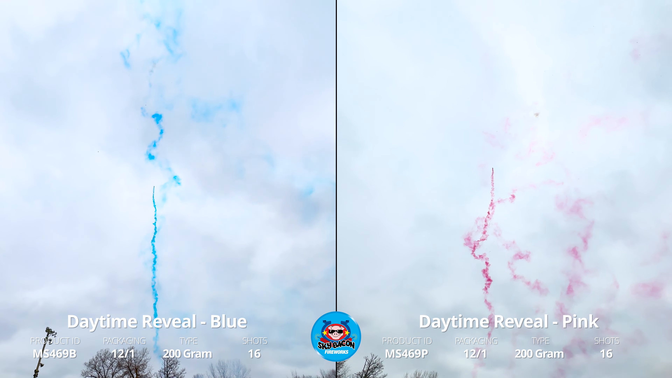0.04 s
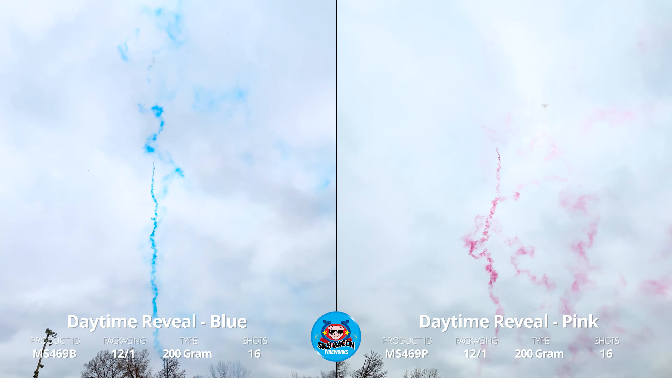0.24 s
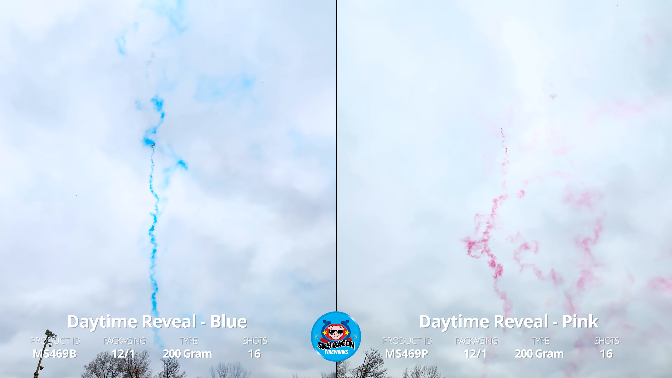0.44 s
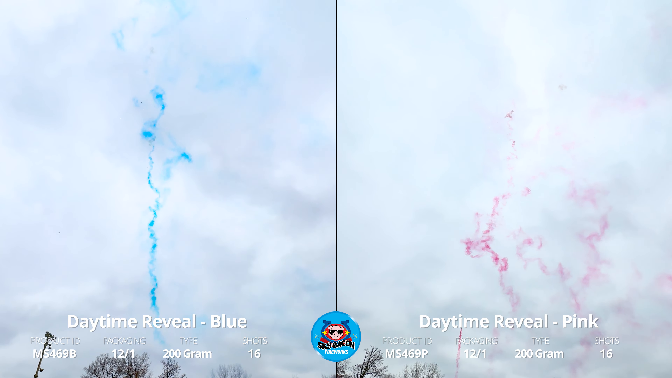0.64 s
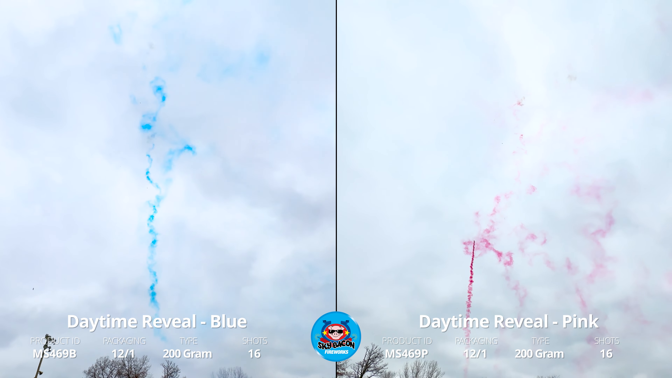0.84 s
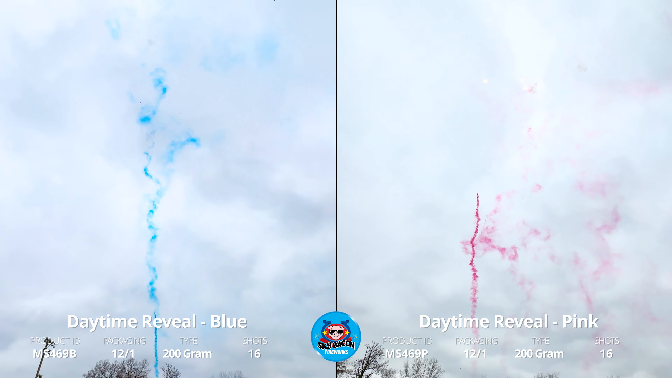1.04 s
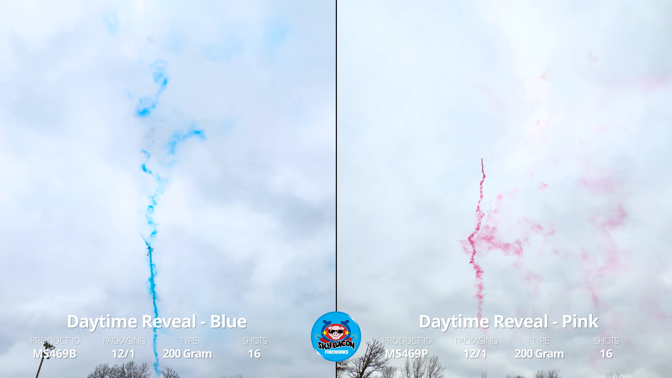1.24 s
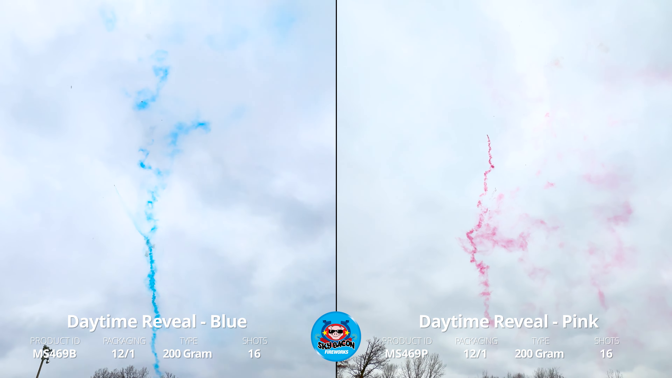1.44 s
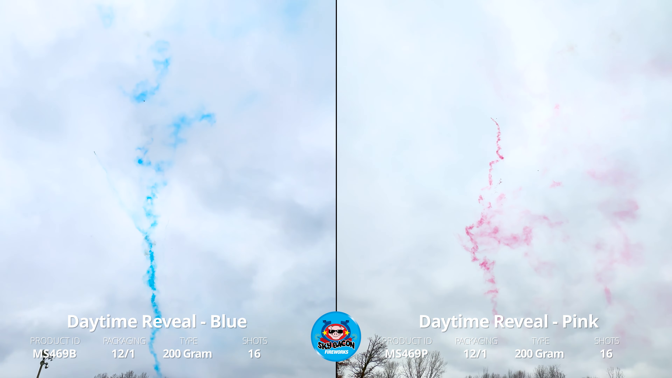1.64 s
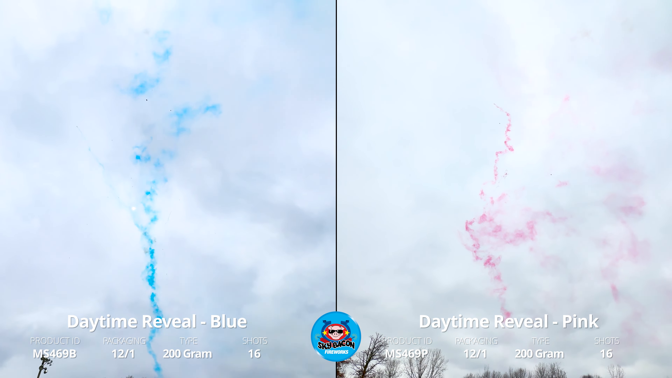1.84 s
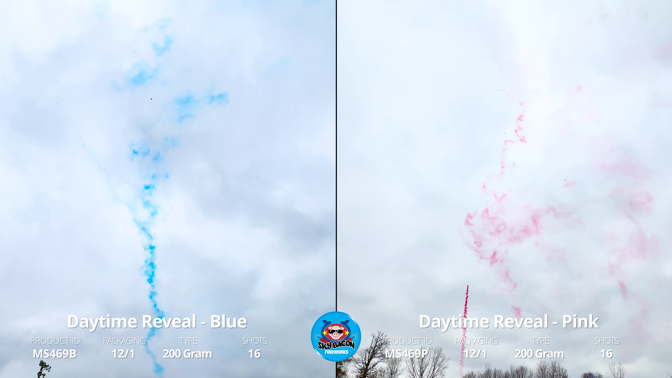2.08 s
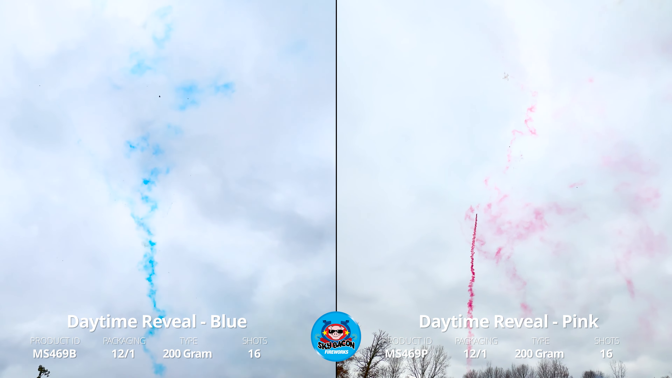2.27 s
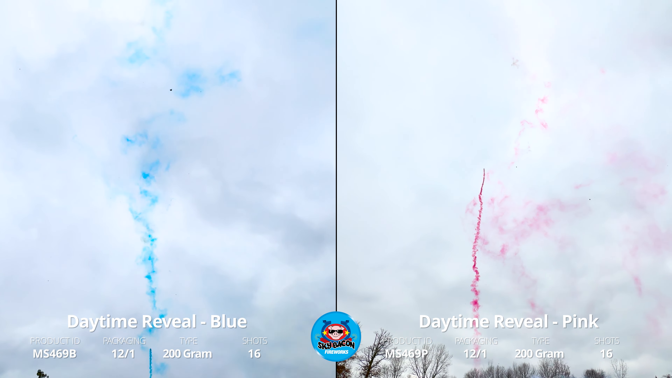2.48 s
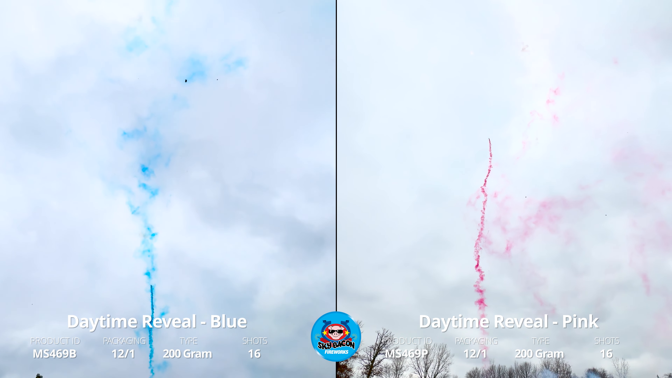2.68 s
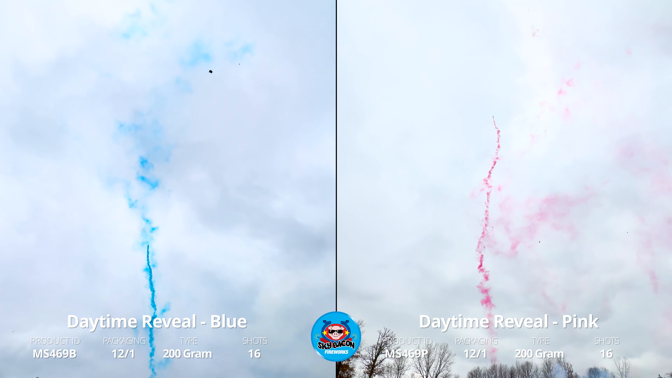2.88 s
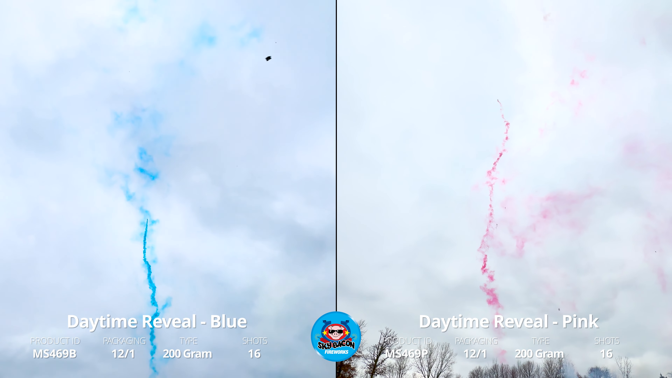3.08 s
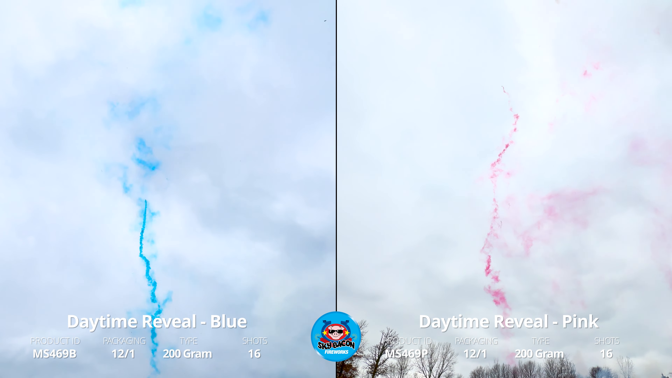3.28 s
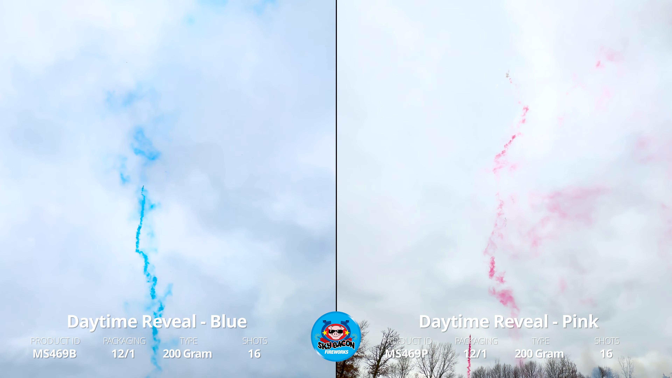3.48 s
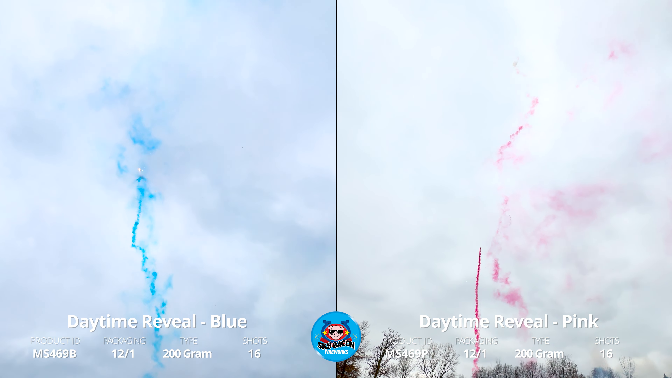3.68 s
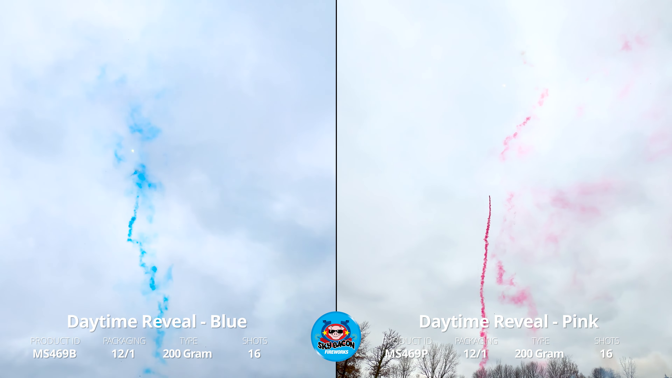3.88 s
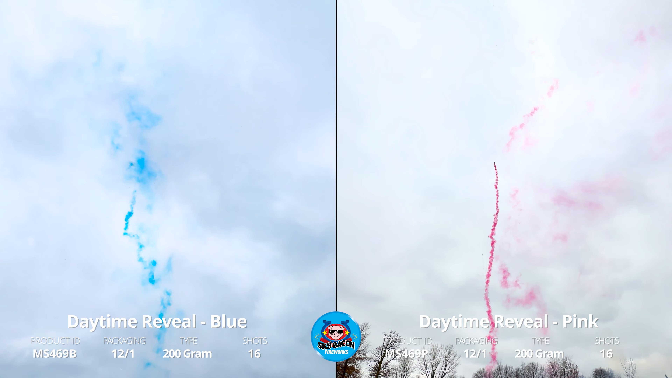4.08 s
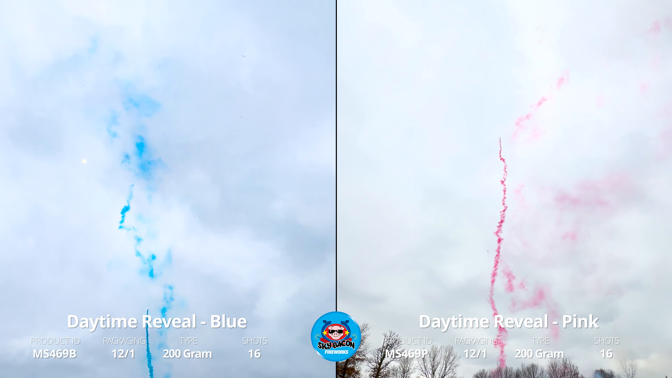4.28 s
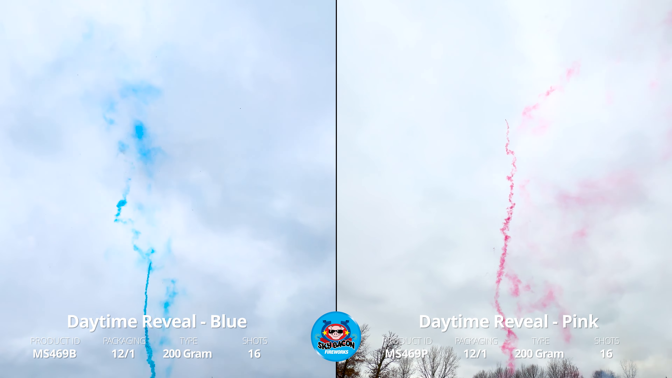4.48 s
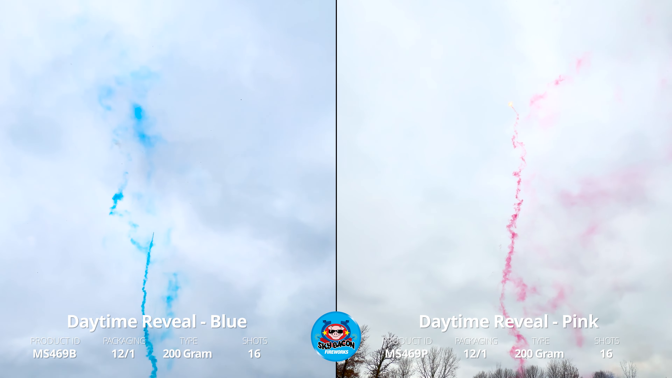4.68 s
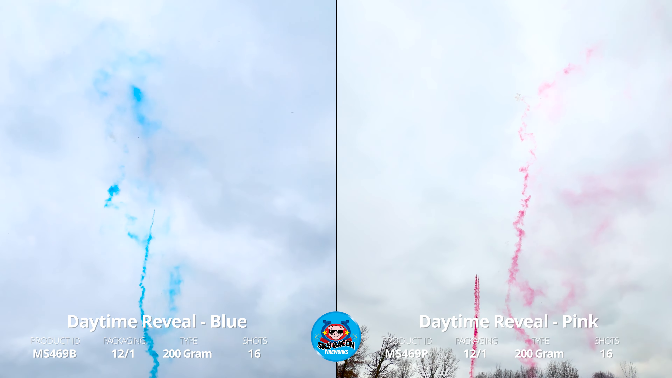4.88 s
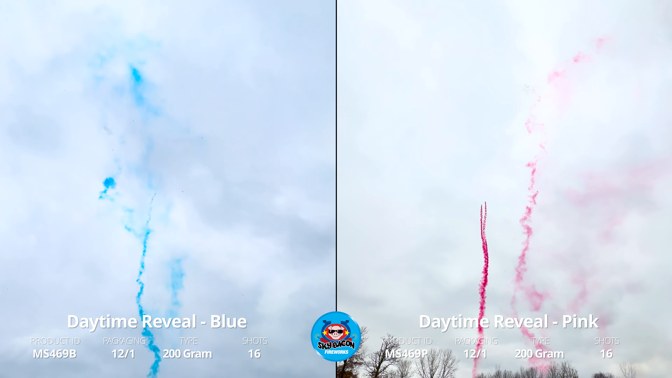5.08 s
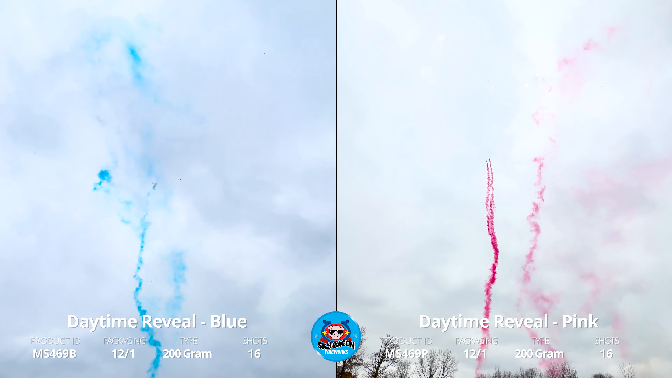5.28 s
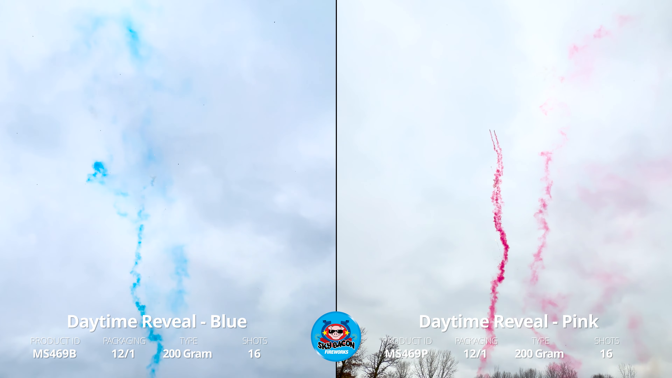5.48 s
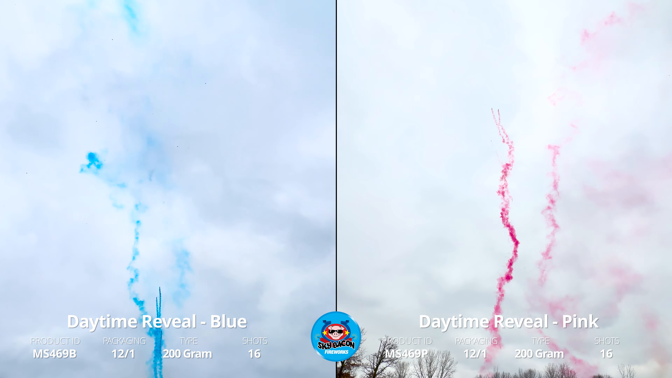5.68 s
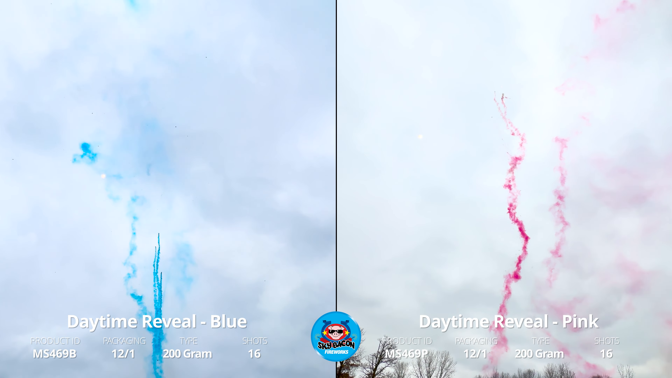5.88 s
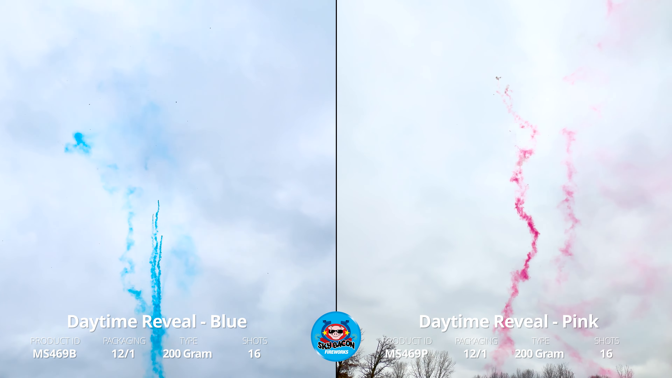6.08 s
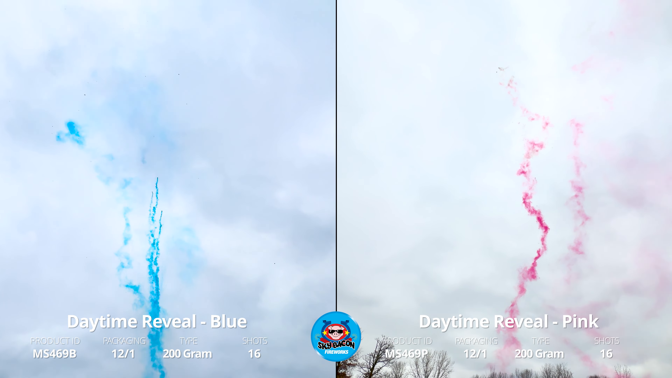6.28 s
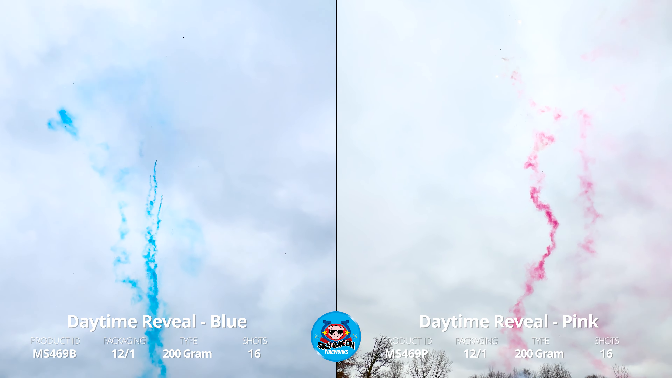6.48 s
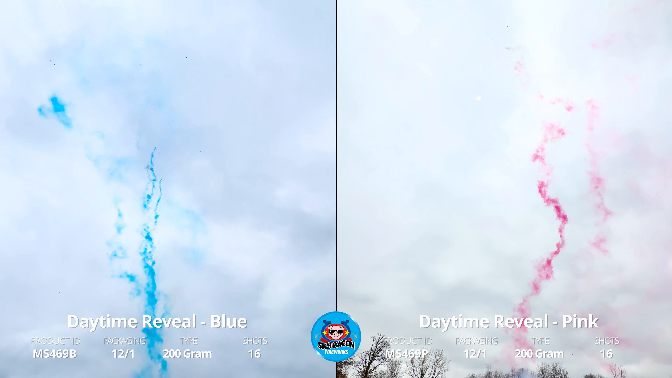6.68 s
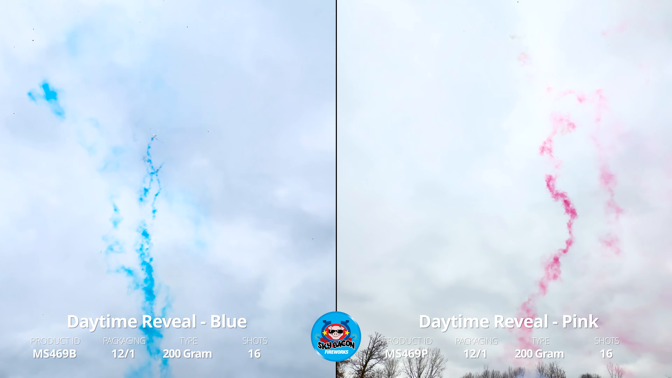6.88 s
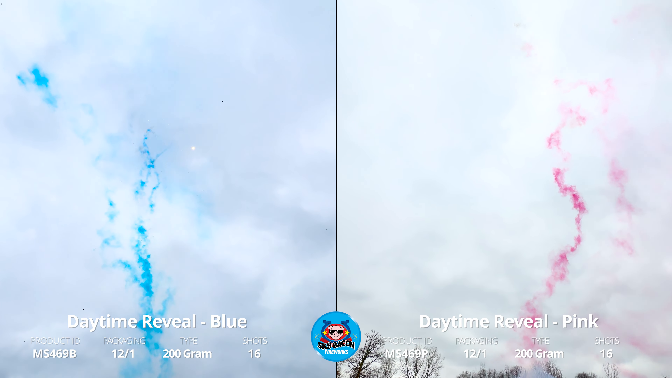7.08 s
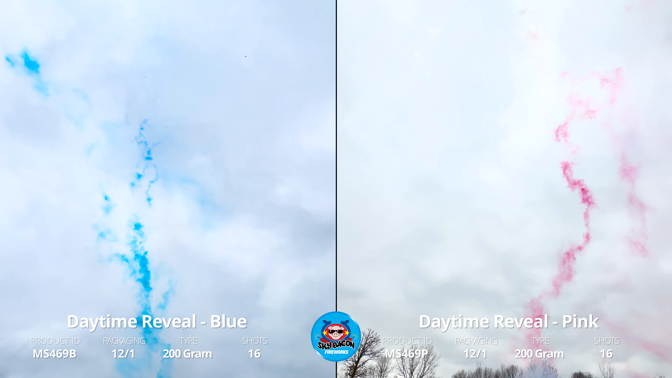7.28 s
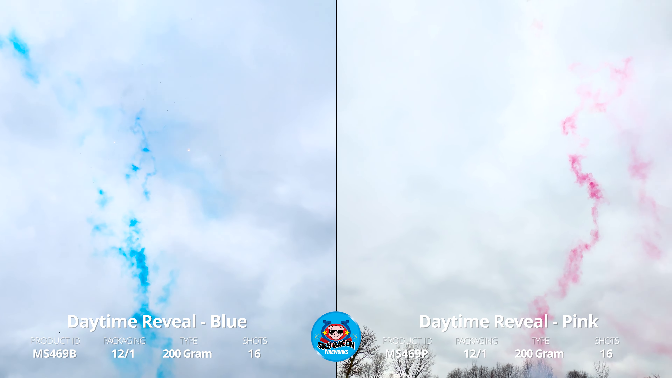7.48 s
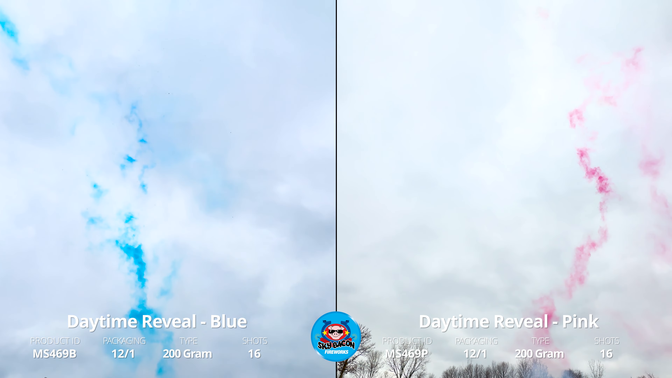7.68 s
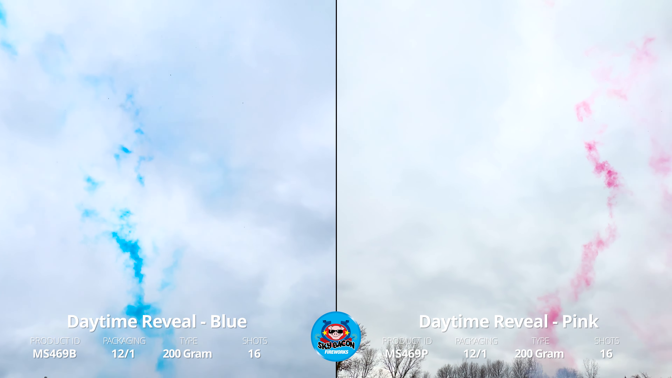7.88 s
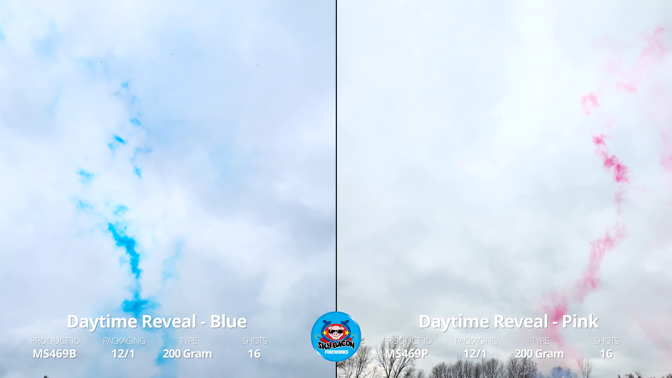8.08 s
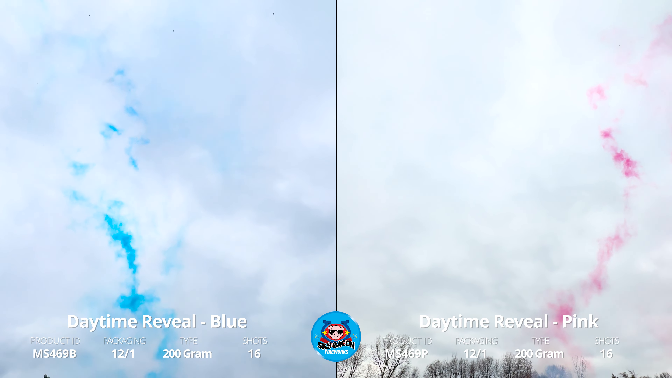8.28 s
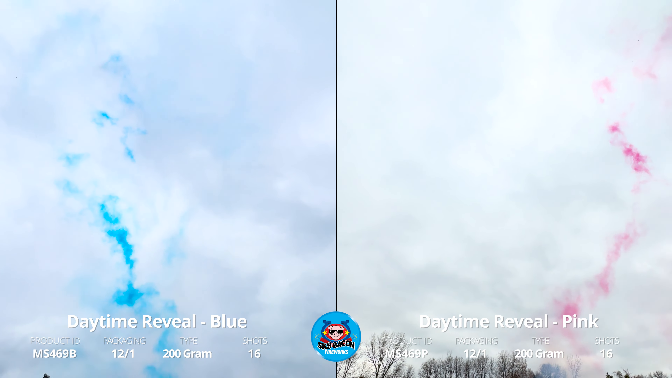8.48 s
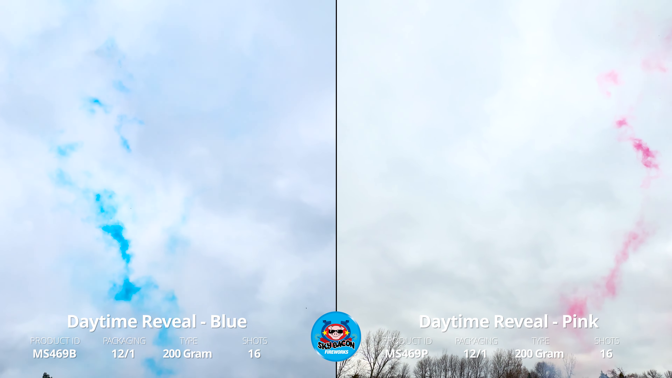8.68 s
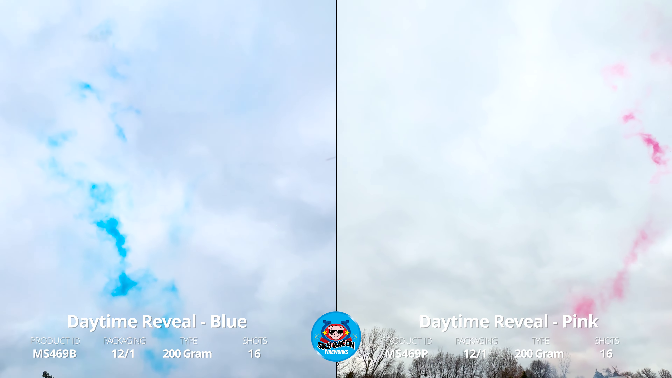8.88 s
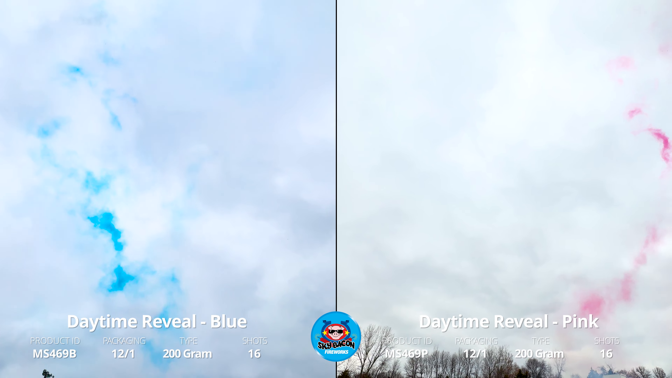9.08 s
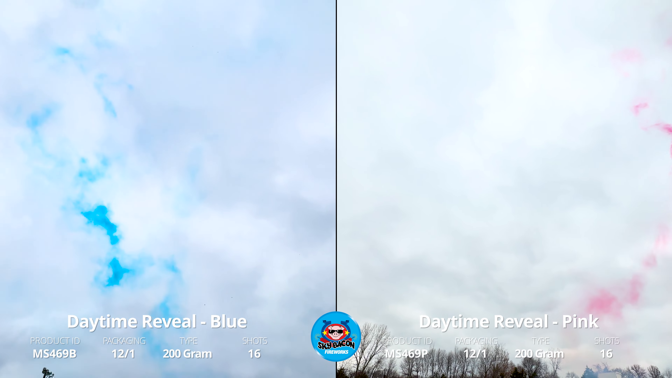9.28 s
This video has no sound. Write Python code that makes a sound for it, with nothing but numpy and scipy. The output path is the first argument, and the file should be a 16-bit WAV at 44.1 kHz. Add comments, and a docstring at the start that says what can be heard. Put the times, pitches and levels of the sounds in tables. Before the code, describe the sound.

Outdoors in an open field, a small firework cake fires unevenly for about seven seconds. Hollow thumps from cardboard tubes send up shells that burst with sharp reports and ringing low booms, followed by runs of dry crackling pops. Echoes slap back from trees and walls and roll away. The crackle ends, leaving a fading roll, faint rumble and one soft distant thud. Stereo microphone on the ground, some way off.

```python
"""A firework cake in an open field, heard in stereo. Crackling stars from an earlier cloud open the scene.
From half a second to seven seconds, lift charges thump in their tubes and shells burst overhead: each burst is
a sharp report, a ground echo and a ringing boom, and clouds of stars crackle as runs of short coloured pops.
Reports slap back from trees and walls and roll into the distance as filtered noise. After the last crackle
the roll thins out over a faint rumble, with one far swell and, near the end, one soft distant thud."""
import sys
import numpy as np
from scipy import signal
from scipy.fft import rfft, irfft, next_fast_len
from scipy.io import wavfile

SR = 44100
rng = np.random.default_rng(int(sys.argv[2]) if len(sys.argv) > 2 else 0)


def wrap_up_sound(samples):
    """Save the sound to the file named by the first command line argument, as 16-bit audio."""
    columns = np.atleast_2d(samples).T
    # keep every value between -1 and 1, then stretch to whole-number steps
    tamed = np.clip(columns, -1, 1)
    steps = np.round(tamed * 32767).astype(np.int16)
    wavfile.write(sys.argv[1], SR, steps)


N = 411889
SIZE = 2 * next_fast_len((N + 3 * SR) // 2, True)   # room for the three-second far roll
HZ = np.maximum(np.fft.rfftfreq(SIZE, 1 / SR), 1)
TIME = np.arange(N) / SR

# Levels of events are those of the shocks before colouring by a spectrum.
# Shells bursting overhead; small ones sound thin:
# (time [s], report level [dB], ground echo delay [s], ground echo level re report [dB],
#  boom level [dB], boom left over right [dB], low cut of the report [Hz])
SHELL_BURSTS = [(0.546, 19, 0.0076, -3, 35, 7, 150), (0.6217, 21, 0.0051, -2.5, 25.5, 3, 250),
                (1.2953, 20.1, 0.0054, -5.5, 25.5, -14.5, 60), (1.4583, 22, 0.0039, -21.5, 18.5, 6.5, 700),
                (2.276, 18.5, 0.0051, -8, 23.5, 7, 150), (3.5404, 18.5, 0.0054, 0, 11.5, 0.5, 50),
                (3.711, 18, 0.0078, -4.0, 30, 7.5, 300), (4.8099, 20.5, 0.0051, -1.5, 32.5, 14, 100),
                (5.3107, 16.5, 0.0078, -4.5, 30, 6.5, 150), (5.4223, 13.5, 0.0085, -0.5, 27.5, 14.5, 248),
                (5.431, 17, 0.0041, 0.5, 33, 15.5, 250), (5.9575, 17.5, 0.005, -10, 19, 14, 400),
                (6.1994, 19, 0.0053, -3, 17.5, 13, 50), (6.6352, 18, 0.0078, -4, 32.5, 13.5, 149),
                (6.8533, 18.5, 0.0081, -2.0, 26.5, 3.5, 50), (6.9622, 16.5, 0.0087, -0.5, 28.5, 14, 60)]
# Lift charges in their tubes: (time [s], thump level [dB], muzzle snap level before a 2 dB cut [dB])
LIFT_CHARGES = [(0.5752, 28, 11), (0.9163, 25.5, 16), (1.9403, 25.5, 13), (2.2986, 20, 15),
                (3.4295, 28.5, 11.5), (3.9383, 20.5, 13), (4.74, 28.5, 12.5), (4.7613, 24, 11.5),
                (4.7771, 27.5, 12)]
# Single stars that pop apart from a cloud or stand out of it: (time [s], level [dB])
SINGLE_STARS = [(0.0742, -1), (0.0878, -2), (0.1674, 0), (0.2079, 4.5), (0.2592, 4), (0.3138, 2),
                (0.3587, 0), (0.3794, 1.5), (0.9435, -4), (1.0211, -3), (1.0343, -1), (1.1382, 3),
                (1.334, -2), (1.366, 0), (1.372, 3.5), (1.8665, -5), (1.901, 3), (1.9553, 5.5), (2.9045, 7),
                (2.9399, 3.5), (3.0046, -1.5), (3.0773, -4.5), (3.0833, 0), (4.106, 6), (4.1192, 6.5),
                (4.1371, 5.5), (4.1568, 7), (4.2248, 4), (4.3076, 6.5), (4.3401, 7), (4.3628, 5.5),
                (4.413, 2), (4.4788, 1), (4.5647, 1), (5.7983, -2), (5.8304, -0.5), (5.8944, 1.5),
                (5.9897, 7.5), (6.4384, -3.5), (6.7112, 3), (7.1659, .5), (7.2466, 2.5), (7.2646, 4),
                (7.3442, 3.5), (7.5125, 2.5), (7.5314, 2.5), (7.6413, 1), (7.7112, 2), (7.7462, -1),
                (7.7775, 0.5)]
# Clouds of crackling stars, the first dying away at time zero:
# (start time [s], end time [s], level of the strongest pops [dB])
STAR_CLOUDS = [(-.5, -0.017, 5.5), (.225, 0.32, 3.5), (1.087, 1.3, 4.5), (1.887, 1.99, 4),
               (2.748, 2.98, -1.5), (2.891, 2.925, 5.5), (3.688, 3.726, 0), (4.0, 4.11, -0.5),
               (4.105, 4.152, 7), (4.171, 4.3, 2.5), (4.306, 4.373, 6.5), (4.79, 4.809, 2),
               (5.257, 5.337, 0), (5.355, 5.445, 6.5), (5.52, 5.86, -8.5), (5.899, 5.985, 4),
               (6.02, 6.15, 1), (6.502, 6.742, 1.5), (6.779, 6.942, 4), (7.152, 7.655, -.5)]
# Duller, more distant reports, the strongest slap-backs, and small pops just ahead of some bursts: (time [s],
# level [dB])
DISTANT_REPORTS = [(0.5385, 8), (0.6949, 7.5), (1.5485, 14), (1.596, 7), (1.775, 0), (2.53, 6),
                   (3.688, 6.5), (5.392, 11), (5.5997, 12.5), (8.105, -14)]
# Trees and walls that throw each burst back:
# (lag [s], level of each return re the mean of report and boom [dB])
TREES_AND_WALLS = [(.148, -30.5), (.252, -29.5), (.3, -31)]
# Thumps coming back at a fixed lag, as the cake stands still: (lag [s], level re thump [dB])
THUMP_ECHOES = [(.265, -19)]
# Sound returning from trees and buildings: (time after the report [s], level [dB])
FAR_RETURNS = [(0, -13), (.15, -10.5), (.24, -0.5), (.32, -.5), (.45, -9.5), (.8, -14), (3, -29)]
# Swells of low rumble from far off: (time at the top [s], half length to 1/e [s], level at the top [dB])
RUMBLE_SWELLS = [(1.6, .045, -36.5), (5.55, .06, -34), (8.561, .11, -56)]

# Spectra, each: (frequency [Hz], level [dB])
REPORT_SPECTRUM = [(40, -23), (200, -3), (1000, 1), (1600, -4.5), (2500, -14), (5000, -17), (10000, -24.5),
                   (16000, -33)]
BOOM_SPECTRUM = [(20, -31), (35, -11.5), (58, 0.5), (100, -4), (180, -11.5), (1200, -67)]
THUMP_SPECTRUM = [(25, -21.5), (140, -2.5), (215, 1.5), (290, -1), (410, 0), (600, -15.5), (900, -31),
                  (3000, -56)]
SNAP_SPECTRUM = [(300, -18.5), (900, -7.5), (1500, 2.5), (2500, 0), (6000, -16.5), (9500, -16),
                 (16000, -33)]
CRACKLE_SPECTRUM = [(40, -18), (250, -8), (600, -3), (1100, -1), (3700, -4), (5200, -7), (9300, -8),
                    (11500, -18.5), (16000, -19)]
ROLL_SPECTRUM = [(40, -11.5), (130, -4.5), (300, -9), (1000, 0), (1700, -5.5), (3000, -13), (10000, -21),
                 (16000, -48)]
BURST_RUMBLE_SPECTRUM = [(20, -35), (47, -4.5), (62, -10.5), (100, -15.5), (170, -23), (1200, -65.5)]
FAR_RUMBLE_SPECTRUM = [(30, -20.5), (55, 0), (95, 1.5), (170, -6.5), (4000, -95)]
AMBIENCE_SPECTRUM = [(20, -22.5), (55, 0), (100, -0.5), (160, -10), (300, -20.5), (650, -6), (1800, -23),
                     (5000, -46), (12000, -57)]

RING_HZ, RING_WIDTH_HZ, RING_DB = 55.5, 4.6, 2.5   # the low note that hangs on after each boom
BURST_BODY_S, BURST_BODY_DB = .0023, -12.5   # hollow body: lag behind the report, level re boom
MID_REPORT_DB, DULLING_DB_PER_DB = 18, 1.6   # the bigger the charge, the longer its shock and the less treble
LIFT_ROLL_DB = 4.5   # what a lift charge sends into the far surroundings, re its tabled snap
STARS_PER_S, STAR_SPREAD_DB = 64, 11   # ignitions in a cloud; range from strongest to weakest star
CLOUD_EDGE_DB = -3   # a cloud is this much weaker as it gathers and as it thins out
SPUTTER_S, SPUTTER_LOSS_DB = .004, 3.8   # mean gap between a star's pops; loss from each pop to the next
STAR_ECHO_S, STAR_ECHO_DB, GROUND_CUT_HZ = .0085, -1.5, 2540
STAR_ECHO_SPREAD_S = .0015   # stars burn at different heights
POP_RING_OCTAVES, POP_RING_Q = .7, 2.2   # spread of ring pitch among pops; sharpness of the ring
EAR_LEAD_S, EAR_SPREAD_S = .000055, .00003   # pops lead on the left, each from its own direction
REFLECTOR_DEPTH_S = .02   # spread of a returning cluster at the longest lag
AIR_DB_PER_S_HZ = .005   # treble loss of the roll as it travels
FAR_THUD_S, FAR_THUD_DB = 9.2, -9   # one soft thud in the distance
CUTOFF_HZ = 16000


def bursts():
    """Shells overhead: report, ground echo, hollow body, and a boom that rings and leaves a low rumble."""
    s, report_db, delay, echo_db, boom_db, pan_db, thin_hz = np.transpose(SHELL_BURSTS)
    treble_db = DULLING_DB_PER_DB * (MID_REPORT_DB - report_db)
    report = pops(s, report_db, ragged=0.83, tilt_db=1, treble_db=treble_db, low_cut_hz=thin_hz)
    echo = pops(s + delay, report_db + echo_db, ragged=.4, low_cut_hz=thin_hz) * ground(cut_hz=2240)
    blasts = np.array([shocks(s, boom_db + side * pan_db / 2 - abs(pan_db) / 4) for side in (1, -1)])
    boom = blasts * (colour(BOOM_SPECTRUM) + from_db(RING_DB) * resonance(RING_HZ, RING_WIDTH_HZ))
    rumble = shocks(s + .03, boom_db) * colour(BURST_RUMBLE_SPECTRUM)
    rumble = rumble * scatter(t60=.62, alike=0.75, grain_db=1.0)
    body = shocks(s + BURST_BODY_S, boom_db + BURST_BODY_DB) * colour(THUMP_SPECTRUM)
    far_send = shocks(s, 11 + 0.26 * boom_db)
    return (report + echo) * colour(REPORT_SPECTRUM), boom + body + rumble, far_send


def lifts():
    """A charge in a cardboard tube: a muzzle snap and a hollow thump, which the surroundings return."""
    s, thump_db, snap_db = np.transpose(LIFT_CHARGES)
    echoes = shocks(*np.transpose(THUMP_ECHOES))
    thumps = shocks(s, thump_db) * colour(THUMP_SPECTRUM) * (1 + echoes)
    snaps = pops(s, snap_db - 2, ragged=.9, tilt_db=2) * colour(SNAP_SPECTRUM)
    return thumps + snaps, shocks(s, snap_db + LIFT_ROLL_DB)


def crackle():
    """Single stars pop once, stars in clouds sputter; each pop is heard again off the ground."""
    s, level_db = np.vstack([SINGLE_STARS] + [cloud(*row) for row in STAR_CLOUDS]).T
    delay = STAR_ECHO_S + STAR_ECHO_SPREAD_S * rng.uniform(-1, 1, len(s))
    direct = pops(s, level_db, ragged=0.65, tilt_db=4.5, ring=1.5, ring_hz=2500, size=512)
    echo = pops(s + delay, level_db + STAR_ECHO_DB, ragged=0.3, ring=1, ring_hz=1500, size=512)
    return (direct + echo * ground(GROUND_CUT_HZ)) * colour(CRACKLE_SPECTRUM)


def cloud(start, end, level_db, size=64, count=3):
    """Stars ignite at uneven moments, each breaking up in a few weakening pops; the cloud swells and fades."""
    jitter, weakness = rng.random((2, size, 1))
    gaps = 2 * SPUTTER_S * rng.random((size, count))
    turn = np.arange(size)[:, None]
    after = (turn + (jitter - .5) * (turn > 0)) / STARS_PER_S   # the first star has no jitter
    phase = after / max(end - start, 1 / SR)
    s = start + after + np.cumsum(gaps, axis=1) - gaps[:, :1]
    star_db = level_db + CLOUD_EDGE_DB * (2 * phase - 1) ** 2 - STAR_SPREAD_DB * weakness
    pop_db = star_db - SPUTTER_LOSS_DB * np.arange(count)
    alight = phase[:, 0] < 1
    return np.column_stack([s[alight].ravel(), pop_db[alight].ravel()])


def pops(times, level_db, ragged, tilt_db=3.5, treble_db=0, low_cut_hz=0, ring=0, ring_hz=1, size=1024):
    """Stereo shocks, each with its own brightness, ring, direction and ragged wake of treble."""
    hz, t = np.maximum(np.fft.rfftfreq(size, 1 / SR), 1), TIME[:size]
    draws = rng.standard_normal((len(times), 2, size + 2))
    bright, direction = draws[:, :1, :1], draws[:, 1:, :1]
    pitch, noise = draws[:, :1, 1:2], draws[:, :, 2:]
    wake = noise * from_db(-60 * t / 0.021)
    wake = rfft(wake / np.sqrt(np.sum(wake ** 2, axis=-1, keepdims=True)))
    wake = wake * ragged * (0.3 + hz / (hz + 4500))
    lag = (direction * EAR_SPREAD_S - EAR_LEAD_S) * np.array([[1], [-1]]) / 2
    front = np.exp(-2j * np.pi * hz * lag)
    tone = from_db(tilt_db * np.clip(bright, -2, 2) * (hz - 2000) / (hz + 3500))
    tone = tone / np.sqrt(1 + (np.reshape(low_cut_hz, (-1, 1, 1)) / hz) ** 4)
    tone = tone * from_db(np.reshape(treble_db, (-1, 1, 1)) / (1 + (3000 / hz) ** 2))
    peak_hz = ring_hz * 2 ** (POP_RING_OCTAVES * np.clip(pitch, -2, 2))
    tone = tone * (1 + ring * resonance(peak_hz, peak_hz / POP_RING_Q, hz))
    lead = size // 16   # room for the earlier channel ahead of the front
    waves = np.roll(irfft((front + wake) * tone), lead, axis=-1)
    train = np.zeros((2, SIZE))
    for s, gain, wave in zip(times, from_db(level_db), waves):
        train[:, (round(s * SR) - lead + np.arange(size)) % SIZE] += gain * wave
    return rfft(train)


def shocks(times, level_db):
    """Spectrum of a train of single-sample pressure shocks."""
    train = np.zeros(SIZE)
    samples = np.clip(np.round(np.asarray(times) * SR).astype(int), 0, N)
    np.add.at(train, samples, from_db(level_db))
    return rfft(train)


def from_db(db):
    """Decibels to gain."""
    return 10 ** (np.asarray(db) / 20)


def at_hz(points, hz=HZ):
    """Read a spectrum table on a log-frequency axis."""
    f, value = np.transpose(points)
    return np.interp(np.log(hz), np.log(f), value)


def colour(points):
    """A causal (minimum-phase) filter with this spectrum: its resonances ring on after the shock."""
    cepstrum = irfft(np.log(from_db(at_hz(points))), SIZE)
    cepstrum[1:SIZE // 2] *= 2   # fold the cepstrum onto positive time
    cepstrum[SIZE // 2 + 1:] = 0
    return np.exp(rfft(cepstrum))


def resonance(hz, width_hz, at=HZ):
    """One ringing mode, gain 1 on top."""
    return 1 / (1 + 1j * (at ** 2 - hz ** 2) / (at * width_hz))


def ground(cut_hz):
    """Grass reflects the lows and swallows the treble."""
    return 1 / np.sqrt(1 + (HZ / cut_hz) ** 4)


def slaps(count=5):
    """Distant reports arrive dull and smeared; trees and walls return each burst in hollow, knocking clusters."""
    s, level_db = np.transpose(DISTANT_REPORTS)
    burst_s, report_db, _, _, boom_db, _, _ = np.transpose(SHELL_BURSTS)[:, :, None, None]
    lag, loss_db = np.transpose(TREES_AND_WALLS)[:, :, None]
    depth, strength = rng.standard_normal((2, len(SHELL_BURSTS), len(TREES_AND_WALLS), count))
    # the spread of a cluster grows with its lag
    back_s = burst_s + lag + REFLECTOR_DEPTH_S * depth * (lag / lag.max()) ** 2
    back_db = (report_db + boom_db) / 2 + loss_db + 3 * np.clip(strength, -2, 1)
    returns = pops(back_s.ravel(), back_db.ravel(), ragged=1.2, ring=1.6, ring_hz=1100)
    return (pops(s, level_db, ragged=1.57) + returns) * ground(cut_hz=2600) * colour(ROLL_SPECTRUM)


def stereo(mid, side, alike):
    """Left and right from two noises; 'alike' is the correlation between the channels."""
    alike = np.clip(alike, 0, 1)
    return np.sqrt(1 + alike) * mid + np.sqrt(1 - alike) * side * [[1], [-1]]


def scatter(t60, alike, grain_db):
    """Stereo response of many small reflectors nearby, dying 60 dB in t60 seconds; unit energy."""
    t = TIME[:2 * SR]
    noise = rng.standard_normal((2, len(t)))
    grain = from_db(grain_db * rng.standard_normal(len(t) // 16 + 1)).repeat(16)[:len(t)]
    mid, side = noise * grain
    h = stereo(mid, side, alike) * from_db(-60 * t / t60)
    return rfft(h / np.sqrt(np.sum(h ** 2) / 2), SIZE)


def distance(lumpy_db, alike):
    """Stereo response of the far surroundings: separate returns that the air dulls as they travel."""
    t = TIME[:3 * SR]
    knots = np.arange(0, 3, .007)
    lumps = np.interp(t, knots, np.minimum(rng.standard_normal(len(knots)), 2))
    level_db = np.interp(t, *np.transpose(FAR_RETURNS)) + lumpy_db * lumps / (1 + t)
    white, h = rng.standard_normal((2, 2, len(t))), 0
    edges = np.geomspace(30, 18000, 14)
    for k, (low, high) in enumerate(zip(edges, edges[1:])):
        band = signal.butter(2, [low, high], "band", fs=SR, output="sos")
        mid, side = signal.sosfilt(band, white[k % 2])   # neighbouring bands use different noise
        hz = np.sqrt(low * high)
        image = stereo(mid, side, alike / (1 + (hz / 2500) ** 2))   # the treble is wider
        h = h + image * from_db(level_db - AIR_DB_PER_S_HZ * hz * t)
    return rfft(h / np.sqrt(2 * np.sum(from_db(level_db) ** 2)), SIZE)


def swells():
    """Far-off low rumble, as filtered noise that rises and sinks again."""
    level = sum(from_db(db) * np.exp(-((TIME - s) / half_s) ** 2) for s, half_s, db in RUMBLE_SWELLS)
    noise = irfft(rfft(rng.standard_normal(SIZE)) * colour(FAR_RUMBLE_SPECTRUM), SIZE)[:N]
    return level * noise / noise.std()


def ambience(level_db):
    """Faint outdoor rumble and hush: steady filtered noise, a little stronger on the left."""
    mid, side = rfft(rng.standard_normal((2, SIZE)))
    air = irfft((mid + 0.33 * side * [[1], [-1]]) * colour(AMBIENCE_SPECTRUM), SIZE)[:, :N]
    return from_db(level_db) * air / air.std() * from_db([[1.5], [-1.5]])


def scene():
    """Direct sound, scatter from nearby, the far roll, and the air of the place."""
    nearby = scatter(t60=0.21, alike=0.36, grain_db=2.5)
    far_echoes = distance(lumpy_db=7.0, alike=0.34)
    far_wash = distance(lumpy_db=6, alike=0.46)
    air = ambience(level_db=-61.5) + swells()
    report, boom, burst_send = bursts()
    thumps, lift_send = lifts()
    distant = slaps()
    stars = crackle()
    thud = shocks([FAR_THUD_S], [FAR_THUD_DB]) * colour(THUMP_SPECTRUM)
    # reports and thumps sit slightly to the left
    direct = (report + thumps) * from_db([[.7], [-.7]]) + stars + boom + distant
    near = from_db(-10.5) * stars + from_db(-16.5) * report + from_db(-19) * thumps
    near = (near + from_db(-7.5) * distant + thud) * nearby
    roll = from_db(-8) * (burst_send + lift_send) * colour(ROLL_SPECTRUM) * far_echoes
    dulled_stars = stars / np.sqrt(1 + (HZ / 5000) ** 2)
    wash = (from_db(-14) * dulled_stars + from_db(-23) * thumps) * far_wash
    return irfft(direct + near + roll + wash, SIZE)[:, :N] + air


def record(dry, lag_cycles=.8, corner_hz=22):
    """Lows come out later than highs, so every shock sweeps downward; peaks are rounded, the top is cut."""
    # well above the corner, each frequency is late by lag_cycles of its own period
    late = np.exp(-2j * np.pi * lag_cycles * np.log(1 + HZ / corner_hz))
    top = 1 / np.sqrt(1 + (HZ / CUTOFF_HZ) ** 120)
    swept = irfft(rfft(dry, SIZE) * late, SIZE)
    rounded = swept / (1 + (swept / .55) ** 6) ** (1 / 6)
    return irfft(rfft(rounded) * top, SIZE)[:, :N]


dry = scene()
out = record(dry)
wrap_up_sound(out)
```